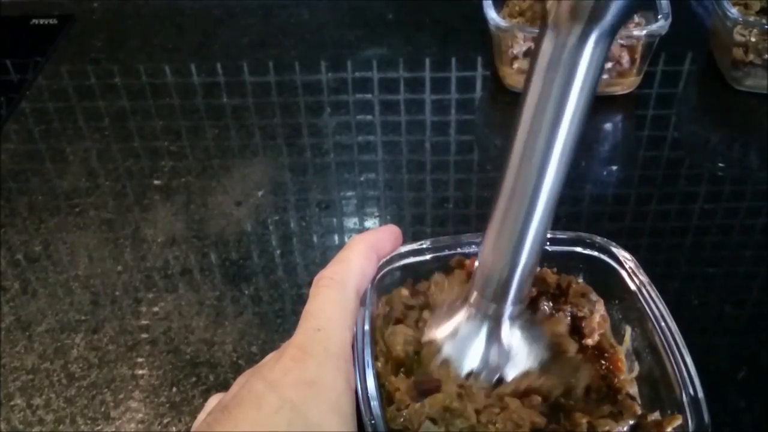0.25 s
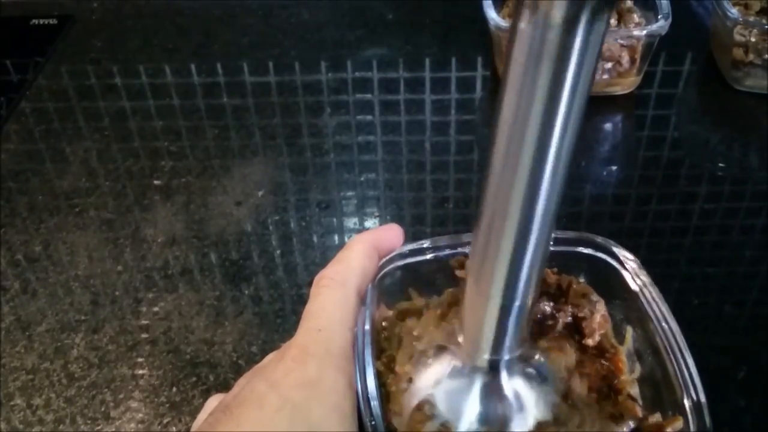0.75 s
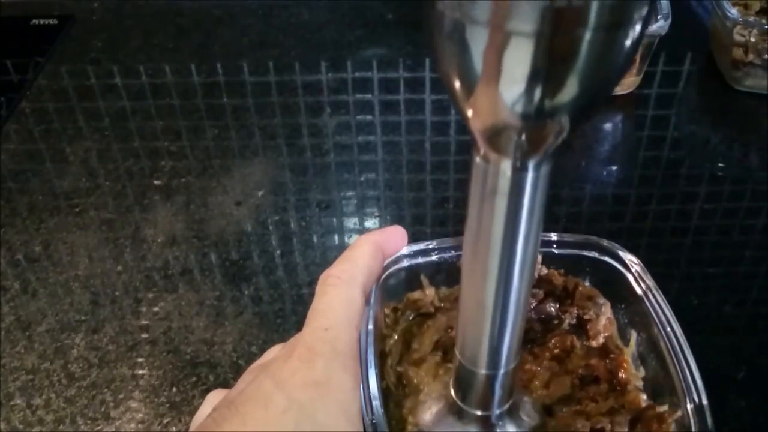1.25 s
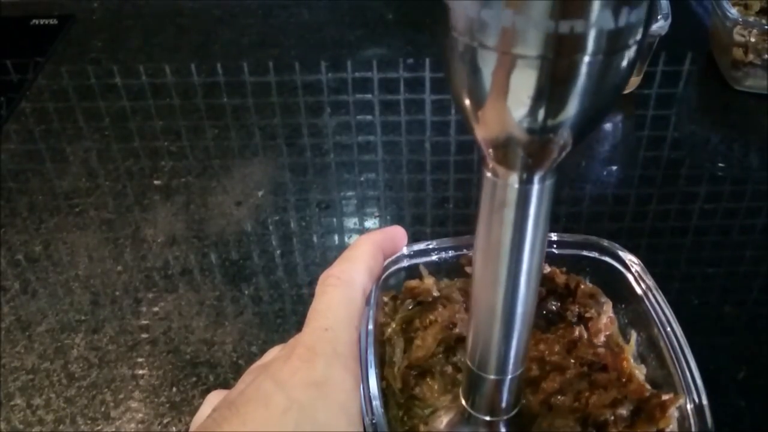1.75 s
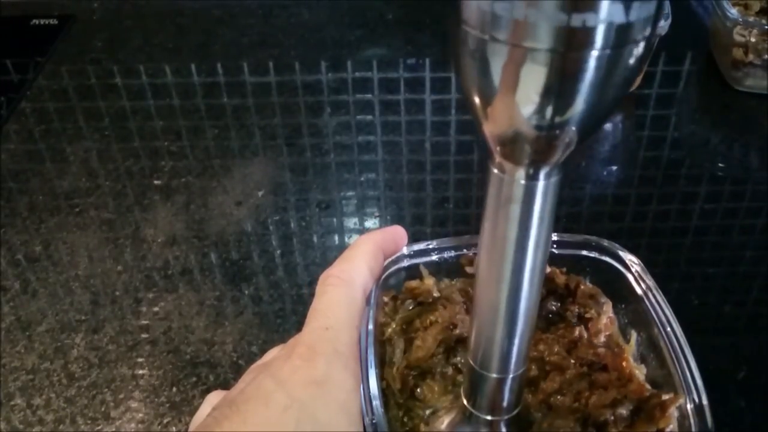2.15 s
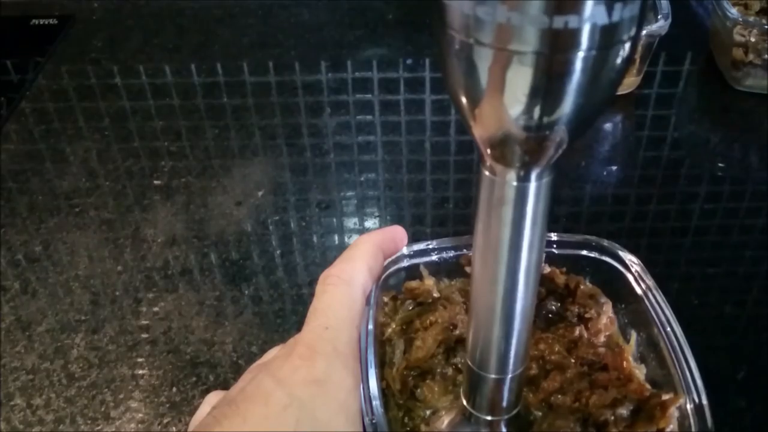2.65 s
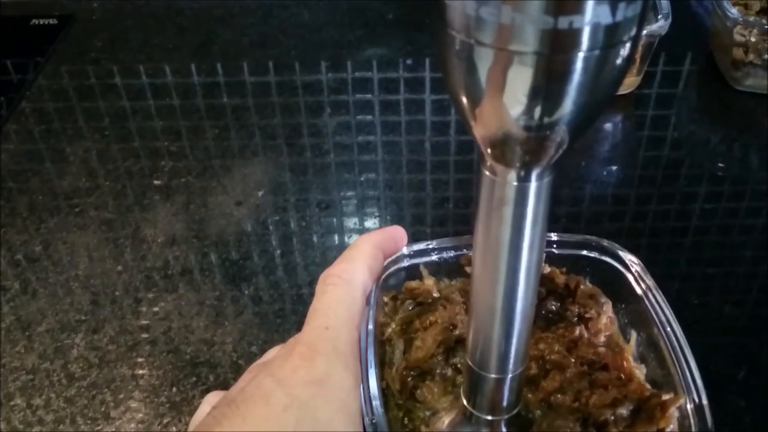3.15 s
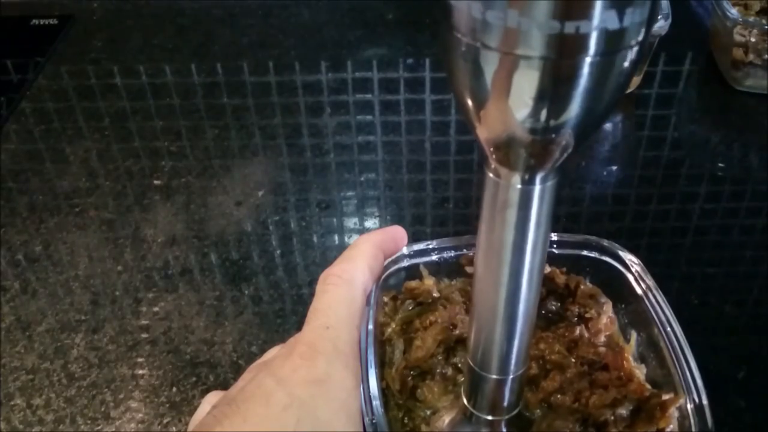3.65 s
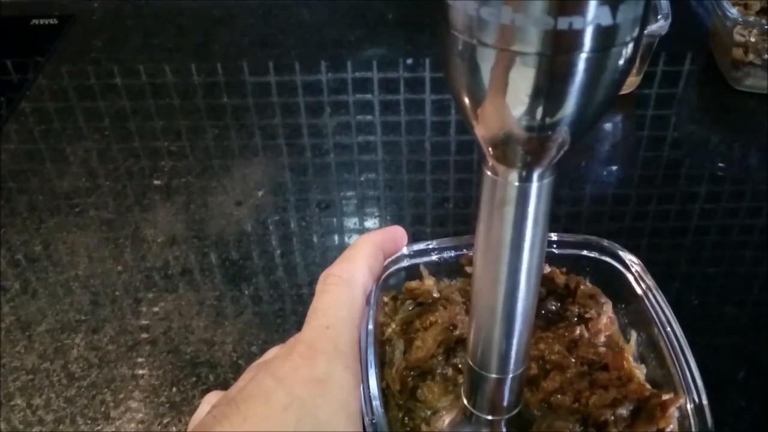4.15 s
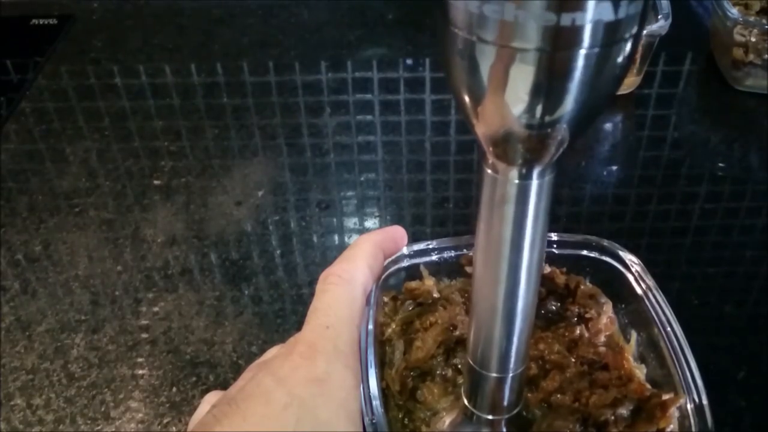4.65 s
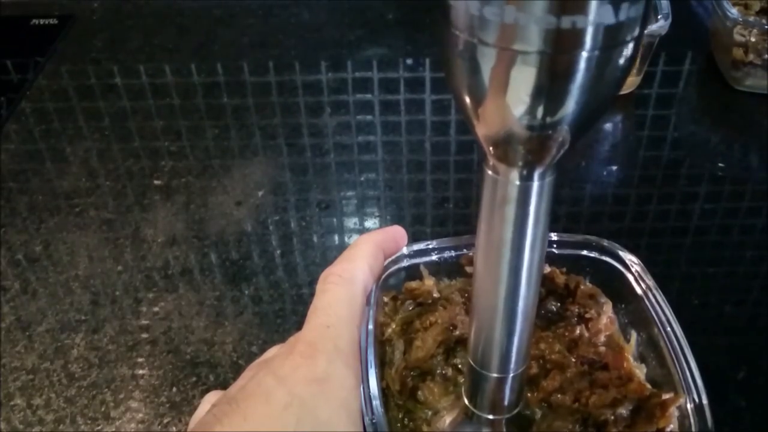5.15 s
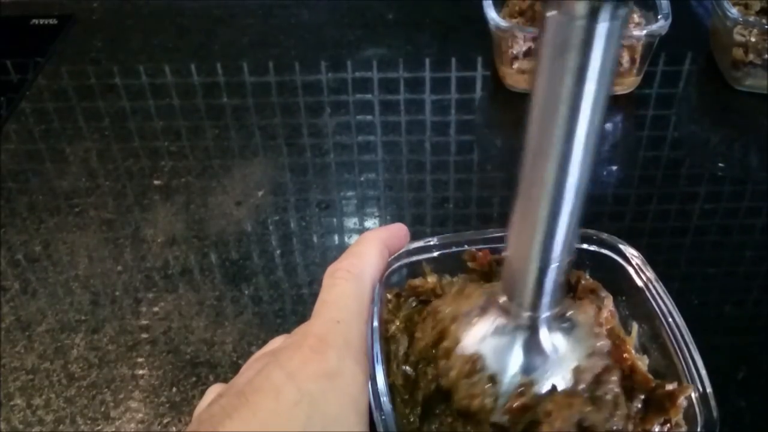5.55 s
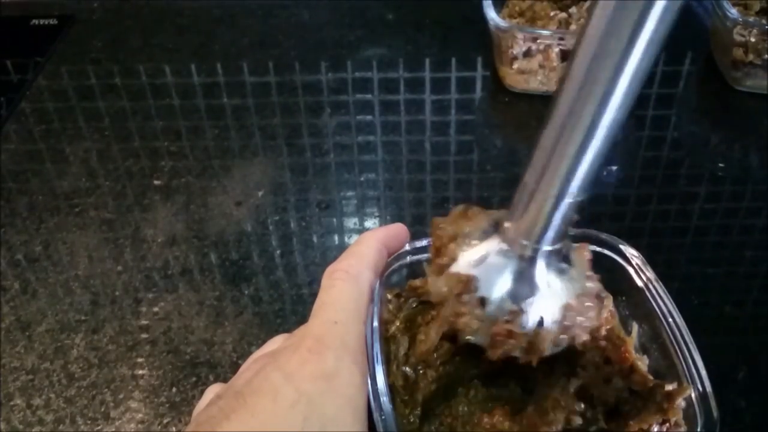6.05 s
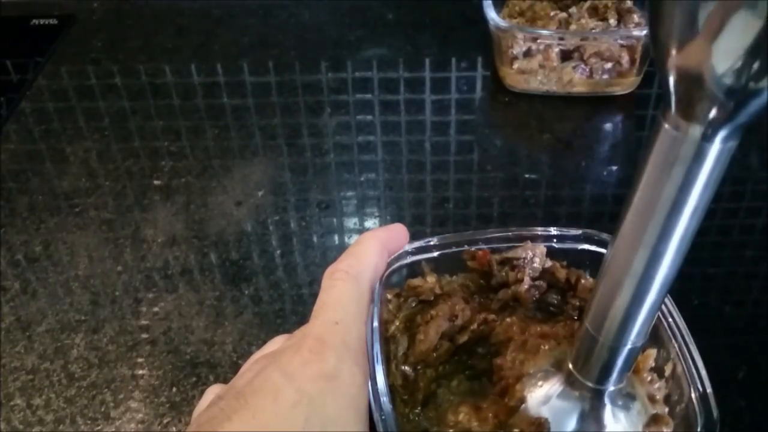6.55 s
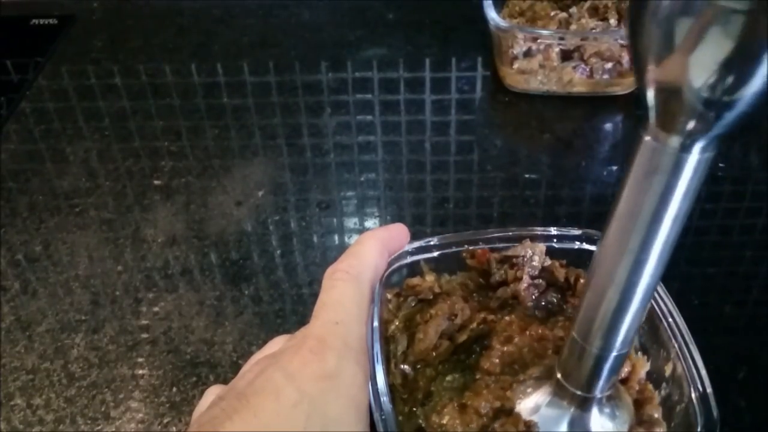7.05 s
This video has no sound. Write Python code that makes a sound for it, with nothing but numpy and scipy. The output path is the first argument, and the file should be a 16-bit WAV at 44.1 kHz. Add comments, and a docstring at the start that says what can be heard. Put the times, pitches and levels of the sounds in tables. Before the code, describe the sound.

Close, slightly left-leaning stereo of a cordless blender in thick food: a fixed-pitch electronic whine over rough gear and blade noise, in five runs with abrupt stops. After the first come hard glassy clacks; the second rattles with chunks; many plastic button clicks frame the short third and buzzing fourth; two hard knocks and soft wet rubs precede the final sustained run. Short bright room echo over quiet humming air.

```python
"""A cordless hand blender in a glass dish of food, in a small hard kitchen with a quiet humming background.
It is running at the start and soon stops; a soft push and steel-on-glass knocks follow, then a run with hard chunks
hitting the guard. Button clicks lead to two short runs, more knocks and faint rubbing, and a last run to the end.
The pulsed drive whines at a fixed pitch with rotor side tones, over shaped noise and grains for gears and blade;
blows are noise bursts through resonances. Two close microphone ports of opposite polarity hear it all."""
import sys
import numpy as np
from scipy import signal
from scipy.fft import rfft, irfft, next_fast_len
from scipy.io import wavfile
from scipy.ndimage import map_coordinates

SR = 44100
rng = np.random.default_rng(int(sys.argv[2]) if len(sys.argv) > 2 else 0)


def wrap_up_sound(samples):
    """Save the sound to the file named by the first command line argument, as 16-bit audio."""
    columns = np.atleast_2d(samples).T
    # keep every value between -1 and 1, then stretch to whole-number steps
    tamed = np.clip(columns, -1, 1)
    steps = np.round(tamed * 32767).astype(np.int16)
    wavfile.write(sys.argv[1], SR, steps)


N = 321930

# drive current, one row a run: (on [s], off [s], whine [dB], lower side tone re whine [dB],
# upper side tone re whine [dB], overtone trim [dB], whine left over right [dB], flutter depth [dB])
DRIVE_RUNS = [(-.2, 0.301, -32.5, -6, -41, -8, -0.5, .5), (1.214, 1.891, -33.5, -8.5, -15, 0, 1.5, .6),
              (3.064, 3.529, -37.5, -6, 1, 2, -0.5, 1.8), (4.727, 5.111, -36, -11, 1, -0.5, 1, 2),
              (6.609, 7.537, -31, -5, -19, -13, -0.5, 1.5)]
# the motor at work: (time [s], rotor pulsation [Hz], roar [dB], low band trim [dB], treble trim [dB])
MOTOR_LOAD = [(0, 202.1, -33, -6, -8), (.08, 213.9, -28.5, -7.5, -3.5), (.18, 243.4, -31, -11, 5),
              (.31, 281.9, -45.5, -2.5, 13), (1.24, 204, -36.5, 0, 3), (1.32, 206.4, -36, -1, 0.5),
              (1.62, 203, -37.5, 0, -2.5), (1.68, 186.6, -32.5, -5.5, -5), (1.9, 185.9, -37.5, -3.5, -0.5),
              (3.1, 200.7, -36.5, -3.5, 0), (3.35, 200.2, -35.5, -2.5, -4), (3.55, 197.4, -40, -1.5, 2.5),
              (4.8, 396.2, -27, -0.5, -2.5), (5.03, 382, -25.5, -5.5, -6), (5.15, 380.5, -33, -1.5, 3),
              (6.63, 386.7, -36.5, -7.5, -2.5), (6.68, 385, -34.5, 4, 2.5), (7.3, 377, -34, 2.5, 2.5)]


def amp(db):
    """Amplitude factor of a level in dB."""
    return 10 ** (np.asarray(db) / 20)


def unit(x):
    """x scaled to an RMS of one."""
    return x / np.sqrt(np.mean(x ** 2) + 1e-20)


def along(points, hz):
    """Reads (frequency [Hz], value) points on a log frequency axis."""
    f, v = np.transpose(points)
    return np.interp(np.log(hz + 1), np.log(f + 1), v)


def curves(rows):
    """One value per sample for each column after the time."""
    s, *cols = np.transpose(rows)
    return [np.interp(np.arange(N) / SR, s, c) for c in cols]


def wobble(rate):
    """A smooth random curve, rate knots a second."""
    knots = rng.standard_normal(int(N * rate / SR) + 4)
    return map_coordinates(knots, [np.arange(N) * rate / SR])


def filtered(x, response):
    """x shaped by a complex response of frequency."""
    m = next_fast_len(x.shape[-1] + 4096)
    spectrum = rfft(x, m) * response(np.fft.rfftfreq(m, 1 / SR))
    return irfft(spectrum, m)[..., :x.shape[-1]]


def modes(table):
    """Causal sum of (frequency [Hz], width [Hz], level [dB]) resonances, alternating in sign."""
    def response(f):
        return sum((-1) ** k * amp(db) * 1j * f * w / (c * c - f * f + 1j * f * w)
                   for k, (c, w, db) in enumerate(table))
    return response


def ringing(table):
    """Causal (frequency [Hz], width [Hz], lift [dB]) peaks on a flat response."""
    return lambda f: np.prod([1 + (amp(db) - 1) * modes([(c, w, 0)])(f) for c, w, db in table], axis=0)


def raised(table, hz):
    """dB added by smooth (frequency [Hz], width [Hz], height [dB]) humps."""
    return sum(db / (1 + (2 * (hz - c) / w) ** 2) for c, w, db in table)


def burst(t60, length=0.046):
    """A dying noise crack, t60 and length in seconds."""
    t = np.arange(round(length * SR)) / SR
    return amp(-60 * t / t60) * rng.standard_normal(len(t))


def snap(t60):
    """One sharp push with a short rattle after it."""
    rattle = 0.43 * burst(t60)
    return np.concatenate([[1], rattle])


def far(pair):
    """Makes two unrelated signals as alike as a diffuse field is at the ports."""
    # (frequency [Hz], correlation of far sound at the two ports [0..1])
    likeness = [(30, 0.96), (100, 0.96), (300, 0.83), (550, 0.86), (750, 0.056), (1500, 0.45),
                (3000, 0.026)]

    def blend(hz):
        turn = np.arccos(np.clip(along(likeness, hz), 0, 1)) / 2
        return np.array([np.cos(turn), np.sin(turn)])
    shared, opposed = filtered(pair, blend)
    return np.array([shared + opposed, shared - opposed])


def heard(x, wet_db, pan_db=0):
    """Direct sound at both ports plus a fresh noise tail that dies as the kitchen's echoes do."""
    # how long the kitchen rings: (frequency [Hz], t60 [s])
    decay = [(200, 0.96), (700, 0.36), (2000, 0.4), (5000, 0.31), (12000, 0.29)]
    # near sound at the ports: (frequency [Hz], left over right [dB])
    tilt = [(100, 8), (400, 5.5), (1200, 7.5), (3000, 4.5), (5000, 7.5), (9000, 14), (10500, 6),
            (13000, -12)]
    port_lag_s = 0.00015  # the right port hears near sound this much later
    side = np.array([[.5], [-.5]])

    def ports(hz):
        gain = amp(side * (along(tilt, hz) + pan_db))
        return gain * np.exp(2j * np.pi * hz * side * port_lag_s)
    direct = filtered(x, ports)
    hz, t, z = signal.stft(rng.standard_normal((2, SR // 2)), SR, nperseg=256)
    dying = z * amp(-60 * t / along(decay, hz)[:, None])
    tail = far(signal.istft(dying, SR, nperseg=256)[1])
    delayed = np.pad(x, (150, 0))[None]  # echoes start 150 samples after the direct sound
    wet = signal.fftconvolve(delayed, tail / np.linalg.norm(tail[0]), axes=1)[:, :len(x)]
    return direct + amp(wet_db) * wet


def add(out, s, db, pulse, wet_db, pan_db=0):
    """Places one blow, its dry peak scaled to db, with its echoes."""
    lead = 64  # samples of room for the earlier port
    blow = amp(db) * pulse / np.abs(pulse).max()
    sound = heard(np.pad(blow, (lead, SR // 2)), wet_db, pan_db)
    spot = out[:, round(s * SR) - lead:][:, :sound.shape[1]]
    spot += sound[:, :spot.shape[1]]


def started(rise_s):
    """0 to 1 after each switch-on, slow at first."""
    t = np.arange(N) / SR
    ons = np.array([run[0] for run in DRIVE_RUNS])
    since_on = t - ons[np.searchsorted(ons, t, side="right") - 1]
    return 1 - np.exp(-(since_on / rise_s) ** 2)


def braked_db():
    """dB lost since the last switch-off, at a steady rate."""
    t = np.arange(N) / SR
    ons, offs = np.transpose(DRIVE_RUNS)[:2]
    since_off = t - offs[np.searchsorted(ons, t, side="right") - 1]
    return 1100 * np.maximum(since_off, 0)  # dB per second


def rotor_hz():
    """The working pulsation, reached from rest at every start."""
    spin_up_s = .047
    return curves(MOTOR_LOAD)[0] * started(spin_up_s)


def whine():
    """The chopped current sings in the windings; the turning rotor splits off a tone on each side."""
    # overtones of the drive: multiple [of the drive pitch], db [dB before each run's trim]
    harmonics = {"multiple": range(2, 7), "db": [-19, -33, -20, -45, -46]}
    drive_hz = 1953.6
    stall_s, kick_s, stalled_db = .032, .014, -8  # the whine starts quieter, then kicks up
    linger_db, linger_t60_s = -15, .55  # it rings on faintly after the current stops
    t, out, rate = np.arange(N) / SR, np.zeros((2, N)), rotor_hz()
    drive = 2 * np.pi * drive_hz * t
    rotor = 2 * np.pi * np.cumsum(rate + 1.6 * wobble(30)) / SR
    depth = np.clip(rate / 190, 0, 1) ** 2  # side tones grow as the rotor gathers speed
    flutter = wobble(40)
    lower = depth * amp(1.3 * wobble(20)) * np.sin(drive - rotor)
    upper = depth * amp(2.2 * wobble(35)) * np.sin(drive + rotor)
    # the stalled motor draws sharp current pulses; its overtones dim once it turns
    overtones = sum(amp(db - .12 * k * k * depth + 2 * wobble(25)) * np.sin(k * drive)
                    for k, db in zip(*harmonics.values()))
    for on, off, db, lower_db, upper_db, over_db, pan_db, flutter_db in DRIVE_RUNS:
        loose = np.clip((t - on - stall_s) / kick_s, 0, 1)
        carrier_db = stalled_db * (1 - loose) + loose * flutter_db * flutter
        carrier = amp(carrier_db) * np.sin(drive + .04 * flutter_db * flutter)
        side_tones = amp(lower_db) * lower + amp(upper_db) * upper
        side_fade = np.clip((t - on) / .06, 0, 1)
        tone = carrier + side_fade * side_tones + amp(over_db) * overtones
        gate = np.clip((t - on) / 0.00098, 0, 1) * np.clip((off - t) / 0.0054, 0, 1)
        dying = (t > off) * amp(linger_db - 60 * np.maximum(t - off, 0) / linger_t60_s)
        linger = dying * (np.sin(drive) + amp(upper_db) * upper)
        span = slice(max(round(on * SR), 0), round((off + 0.5) * SR))
        out[:, span] += heard((amp(db) * (gate * tone + linger))[span], wet_db=-17, pan_db=pan_db)
    return out


def roar():
    """Gear chatter and blade impacts: noise and spiky grains, throbbing with the rotor, through the housing."""
    # relative noise spectrum of gears and blade: (frequency [Hz], density [dB per Hz])
    gear_noise = [(60, -14), (150, -18.5), (300, -17.5), (560, -10), (1190, -8), (1650, -8.5), (2000, -5),
                  (2500, -11.5), (3850, -11), (5000, -20), (7700, -22.5), (10500, -31), (14000, -34),
                  (15700, -54.5)]
    # resonances of the housing: (frequency [Hz], width [Hz], height over the rest [dB])
    housing = [(1180, 260, 4.5), (2130, 300, 3), (2910, 360, 4.5), (3980, 420, 6), (6500, 980, 5.5)]
    rise_s, growth = 0.042, 1.63  # time scale and steepness of the swell at each start
    _, work_db, low_db, treble_db = curves(MOTOR_LOAD)
    level_db = work_db - braked_db()
    hits = rng.random(N) < 500 / SR  # about 500 grains a second
    grains = hits * amp(2.5 * rng.standard_normal(N)) * np.sign(rng.standard_normal(N))
    throb = 1 + 0.32 * np.cos(2 * np.pi * np.cumsum(rotor_hz()) / SR)
    rough = amp(1.6 * wobble(12) + 2.5 * wobble(90))
    source = throb * rough * rng.standard_normal(N) + 0.39 * unit(grains)
    body = unit(filtered(source, lambda hz: amp(along(gear_noise, hz) + raised(housing, hz))))
    low = filtered(body, lambda hz: 1 / (1 + (hz / 1600) ** 6))
    treble = filtered(body, lambda hz: 1 - 1 / (1 + (hz / 4600) ** 8))
    middle = body - low - treble
    balanced = amp(low_db) * low + middle + amp(treble_db) * treble
    loud = amp(level_db) * started(rise_s) ** growth * balanced
    out, hop = np.zeros((2, N + SR)), SR // 8
    # overlapping pieces, each with its own echo tail, keep the roar's colour even
    for start in range(-hop, N, hop):
        at = max(start, 0)
        piece = loud[at:start + 2 * hop]
        if level_db[at:start + 2 * hop].max() > -80:  # skip silent stretches
            fade = np.sin(np.pi * (at - start + np.arange(len(piece))) / (2 * hop)) ** 2
            sound = heard(np.pad(fade * piece, (0, SR // 2)), wet_db=-0.5)
            out[:, at:at + sound.shape[1]] += sound
    return out[:, :N]


def buzz():
    """The dish buzzes on the counter in the fast fourth run: slightly unsteady tones."""
    # (frequency [Hz], level [dB])
    dish_tones = [(153, -42), (610, -53.5), (2218, -41.5)]
    lag_s, rise_s, fall_s = 0.071, 0.056, .03
    t = np.arange(N) / SR
    on, off = DRIVE_RUNS[3][:2]
    gate = np.clip((t - on - lag_s) / rise_s, 0, 1) * np.clip(.5 + (off - t) / fall_s, 0, 1)
    tones = sum(amp(db + 1.2 * wobble(15)) * np.sin(2 * np.pi * hz * t + .4 * wobble(25))
                for hz, db in dish_tones)
    return heard(gate * tones, wet_db=-14)


def knocks():
    """Steel foot on glass: a dying clatter through the damped modes of the dish, over a thump of the counter."""
    # (time [s], peak before soft clipping [dB], low ring [dB], treble [dB], favoured ring [Hz],
    # second favoured ring [Hz], clatter t60 [s], echo [dB])
    blows = [(0.779, -0.5, -15.5, -3, 3340, 2750, 0.055, -1.5),
             (0.8173, 7, -3.5, 0.5, 2720, 1930, 0.064, -4.5), (0.8612, -11, 0.5, 9, 3400, 4000, 0.02, 2.5),
             (0.8955, -4.5, -5, -1, 2620, 1340, 0.035, 1.5),
             (5.3093, -22.5, -9, -3, 3320, 2100, 0.02, -5.5),
             (5.316, -22, -11.5, -2.5, 1360, 2100, 0.028, 0.5),
             (5.3753, 1.5, 5.5, -8, 2330, 2900, 0.012, 2), (5.3824, 6.5, 4, 2.5, 2190, 2560, 0.059, -3.5)]
    # modes of the dish, damped by the food: (frequency [Hz], width [Hz], lift over the clatter [dB])
    glass = [(713, 49, 6.5), (848.5, 16, 12.5), (1370, 410, 10), (2017, 180, 12), (2580, 100, 2),
             (2790, 85, 7), (3460, 120, 4), (3820, 250, 4)]
    # relative spectrum of the clatter: (frequency [Hz], density [dB per Hz])
    clatter = [(60, -40.5), (250, -22.5), (520, -15.5), (900, -12.5), (2000, -19), (2800, -14), (3900, -10),
               (4600, -20.5), (8000, -30.5), (15700, -52)]
    out, t = np.zeros((2, N)), np.arange(round(.3 * SR)) / SR
    thump = np.sin(2 * np.pi * 75 * t) * amp(-60 * t / .18)
    for s, db, low_db, treble_db, spot_hz, next_hz, t60, wet_db in blows:
        # the struck spot favours some modes
        favoured = [(800, 200, low_db), (spot_hz, 350, 7), (next_hz, 300, 5)]

        def dish(hz):
            tilt_db = raised(favoured, hz) + treble_db * (1 - 1 / (1 + (hz / 4800) ** 6))
            return amp(along(clatter, hz) + tilt_db) * ringing(glass)(hz)
        crack = 1.6 * burst(.015, length=.3) + burst(t60, length=.3)
        ring = filtered(crack, dish)
        add(out, s, db, ring / np.abs(ring).max() + .008 * thump, wet_db=wet_db, pan_db=2.5)
    return out


def buttons():
    """Button clicks: each bright snap rings the plastic shell; a dull one passes its resonances twice."""
    # bright button clicks: (time [s], peak [dB], left over right [dB], ring of the shell [dB])
    bright_clicks = [(0.3025, -19.5, -2, -12), (1.136, -20.5, 2.5, 5), (1.8843, -17, -3, -2.5),
                     (2.281, -26.5, 1, -6), (2.5592, -25.5, 1.5, 1), (2.9682, -19, 4, 10),
                     (3.527, -17.5, 6, 1.5), (3.8373, -27, -2, 2), (4.1333, -27.5, -0.5, 3),
                     (4.325, -27, 0.5, 4), (4.6336, -17, 5.5, 9.5), (5.1028, -19.5, 5, -1.5),
                     (6.5181, -19, -3.5, -1)]
    # dull button clicks: (time [s], peak [dB], left over right [dB])
    dull_clicks = [(2.0564, -44.5, 3), (2.462, -29, 1), (2.6934, -31, 5), (2.7405, -48, 16),
                   (3.0674, -41.5, 5), (4.002, -29.5, -1), (4.2631, -29, 1), (4.4412, -28, -1),
                   (4.727, -44, -4)]
    # resonances of the bright clicks: (frequency [Hz], width [Hz], level [dB])
    bright_modes = [(1388, 1300, -11), (2349, 320, -0.5), (3760, 720, -4.5), (4615, 600, -6),
                    (6130, 1400, -0.5), (7730, 1800, -5), (9400, 300, -8), (13000, 1100, -14.5)]
    # resonances of the dull clicks, in each of two passes: (frequency [Hz], width [Hz], level [dB])
    dull_modes = [(1038, 660, -3.5), (2230, 540, 3), (3190, 600, 4), (7800, 600, -10.5)]
    shell_hz, shell_width_hz = 6170, 900
    out = np.zeros((2, N))
    for s, db, pan_db, ring_db in bright_clicks:
        shell = ringing([(shell_hz, shell_width_hz, ring_db)])
        click = filtered(snap(.012), lambda hz: modes(bright_modes)(hz) * shell(hz))
        add(out, s, db, click, wet_db=-9.5, pan_db=pan_db)
    for s, db, pan_db in dull_clicks:
        click = filtered(snap(.009), lambda hz: modes(dull_modes)(hz) ** 2)
        add(out, s, db, click, wet_db=-12, pan_db=pan_db)
    return out


def chunks():
    """Hard chunks and small contacts on the guard: a tick with one short ring and a bright edge."""
    # (time [s], peak [dB], ring [Hz], treble re ring [dB], treble [Hz])
    contacts = [(1.0466, -49.5, 5100, 0, 9800), (1.0955, -53.5, 5400, -2, 8900),
                (1.1175, -34, 3640, -21, 7600), (1.189, -41.5, 7100, -6, 9000),
                (1.198, -27.5, 4230, -13.5, 10900), (1.228, -43.5, 9000, 5, 11500),
                (1.293, -29.5, 3770, -11, 12400), (1.321, -38, 4000, -13, 9000),
                (1.337, -34, 4050, -17, 9800), (1.4078, -17.5, 3080, -8, 7700),
                (1.4577, -21.5, 2970, -13, 10800), (1.633, -18.5, 3500, -19, 12500),
                (1.6447, -13.5, 3340, -18.5, 12000), (1.712, -25.5, 3900, -7, 7600),
                (2.1267, -48, 2970, -30, 7550), (3.6941, -46.5, 5840, -22, 7600),
                (5.243, -35, 3900, -10.5, 7350), (5.2864, -31, 3030, -30, 7600),
                (6.4148, -46, 3480, -13, 6060), (6.553, -31, 3560, -36, 7600),
                (6.592, -36, 2700, -15, 7600), (6.616, -32.5, 1350, -13, 3500),
                (6.9549, -30, 3910, -26, 7600)]
    out = np.zeros((2, N))
    for s, db, hz, treble_db, treble_hz in contacts:
        ring, edge = modes([(hz, 1000, 0)]), modes([(treble_hz, 1500, treble_db)])
        tick = filtered(burst(0.029), lambda f: ring(f) ** 2 + edge(f))
        add(out, s, db, tick, wet_db=-6)
    return out


def paste():
    """Dull pushes as filtered noise swells, and a faint rub of steel in wet food as noise sliding in pitch."""
    # soft pushes into the paste: (time [s], peak [dB], centre [Hz], length [s], left over right [dB])
    pushes = [(0.436, -46, 792, 0.085, 10.5), (5.739, -38, 786, 0.068, 7.5)]
    # rubbing strokes: (loudest at [s], half length [s], noise level before the pitch shift [dB],
    # first pitch [Hz], last pitch [Hz])
    strokes = [(2.92, 0.053, -53, 3830, 3190), (3.959, 0.054, -53.5, 3420, 3380),
               (5.89, 0.049, -63, 4044, 4130), (6.012, .055, -56.5, 4194, 3900),
               (6.098, .045, -56, 3900, 2730), (6.43, 0.059, -57.5, 3870, 3900)]
    swell_db = 25  # rise from the ends of a stroke to its middle
    out = np.zeros((2, N))
    for s, db, hz, length, pan_db in pushes:
        t = np.arange(round(length * SR)) / SR
        push = np.sin(np.pi * np.sqrt(t / length)) * rng.standard_normal(len(t))  # quick to press, slow to ease
        dull = modes([(hz, 500, 0), (280, 200, -6), (1600, 900, -9)])
        thud = filtered(np.pad(push, (0, 2000)), lambda f: dull(f) ** 2)
        add(out, s, db, thud, wet_db=1.5, pan_db=pan_db)
    path = []
    for s, half, db, first, last in strokes:
        path += [(s - half, db - swell_db, first),
                 (s, db, (first + last) / 2),
                 (s + half, db - swell_db, last)]
    level_db, centre_hz = curves(path)
    fuzz = unit(filtered(rng.standard_normal(N), lambda hz: 1 / (1 + (hz / 400) ** 4)))
    carrier = np.sin(2 * np.pi * np.cumsum(centre_hz) / SR)  # lifts the fuzz to the sliding pitch
    return out + heard(amp(level_db) * fuzz * carrier, wet_db=3.5)


def kitchen():
    """Far background of filtered noise: gently wavering air, a steady low hum and a thin flickering hiss."""
    # relative spectrum of the air: (frequency [Hz], density [dB per Hz])
    air_noise = [(15, -37), (40, -14.5), (120, -16), (450, -21), (600, -24.5), (1000, -29.5), (2000, -34),
                 (3200, -37.5), (3950, -35.5), (5000, -41), (9500, -46), (11000, -62), (15700, -77)]
    air_db, hum_db, hiss_db = -51, -52.5, -68.0
    hum = filtered(rng.standard_normal((2, N)), lambda hz: modes([(62, 20, 0)])(hz) ** 2)
    air = filtered(rng.standard_normal((2, N)), lambda hz: amp(along(air_noise, hz)))
    hiss = filtered(rng.standard_normal((2, N)), lambda hz: modes([(4050, 500, 0)])(hz) ** 2)
    wavering = amp(air_db + 0.821 * wobble(2.4)) * unit(air)
    flicker = amp(hiss_db + 4 * wobble(11.0)) * unit(hiss)
    balance = amp([[.6], [-.6]])  # left slightly louder
    return far(wavering + amp(hum_db) * unit(hum) + flicker) * balance


def scene():
    """All sources together at the two ports."""
    return whine() + roar() + buzz() + knocks() + buttons() + chunks() + paste() + kitchen()


def record(dry):
    """The right port is wired inverted; loud peaks clip softly; nothing is kept above the band limit."""
    top_hz = 15886
    x = dry * [[1], [-1]]
    x = x / (1 + np.abs(x / .96) ** 8) ** (1 / 8)
    return filtered(x, lambda hz: hz < top_hz)


dry = scene()
out = record(dry)
wrap_up_sound(out)
```